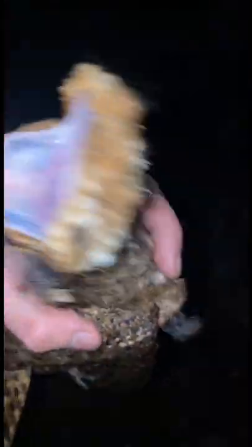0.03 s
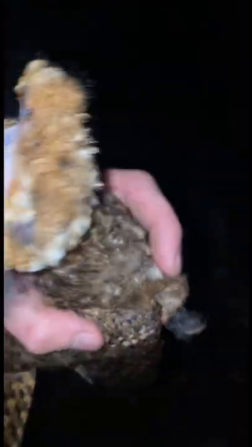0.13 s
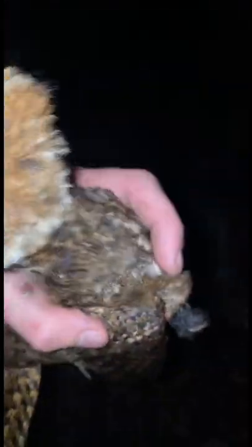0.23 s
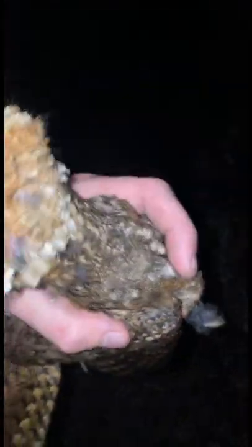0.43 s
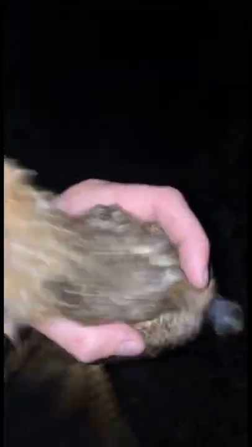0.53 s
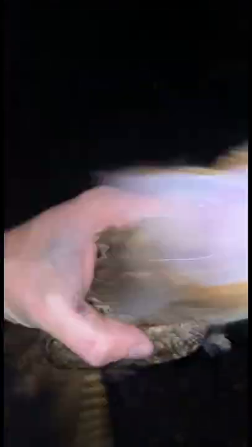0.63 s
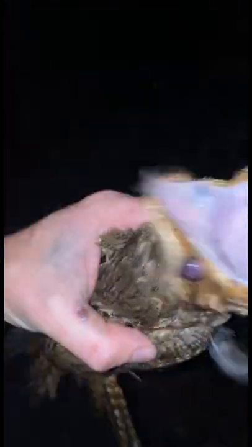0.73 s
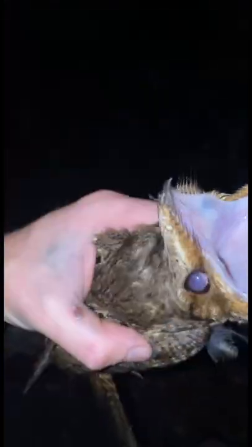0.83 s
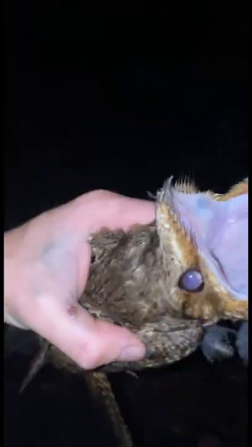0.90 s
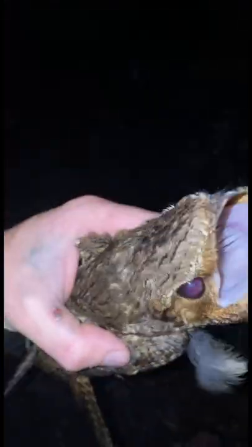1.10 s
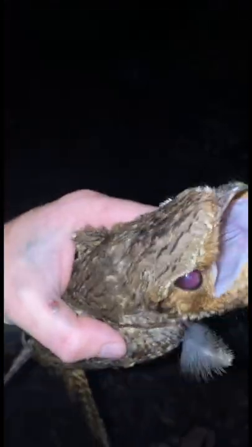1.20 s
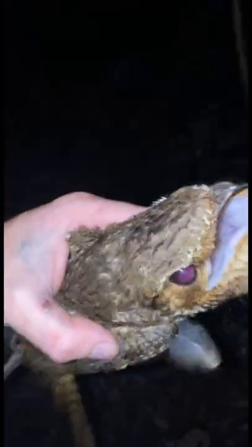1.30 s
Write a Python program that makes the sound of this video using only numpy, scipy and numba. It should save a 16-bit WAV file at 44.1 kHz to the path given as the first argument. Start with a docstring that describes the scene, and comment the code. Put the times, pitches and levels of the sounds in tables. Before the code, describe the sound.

A bird held in the hand gives one low, rasping growl close to the microphone. Feathers rustle and crackle in the grip, a faint soft note follows, then a sharp snap. Distant insects and a low hum fill the night.

```python
"""A bird held in the hand, close to the microphone, gapes and gives one low, rasping growl.
Its syrinx buzzes on an unsteady pitch, chopped by a slower flutter, and air rasps through the
wide-open mouth; a faint, nearly pure note follows. Feathers crackle in the grip, just as close.
Farther off in the night air are insects and a faint low hum."""
import sys
import numpy as np
from scipy import signal
from scipy.fft import rfft, irfft
from scipy.io import wavfile
from scipy.ndimage import uniform_filter1d, map_coordinates
from numba import njit

SR = 44100
rng = np.random.default_rng(int(sys.argv[2]) if len(sys.argv) > 2 else 0)


def to_wav(sig):
    """Store sig (one row per channel, or 1-D mono) as 16-bit WAV at the path in sys.argv[1].

    Samples outside -1..1 are clipped; the rate is SR.
    """
    pcm = np.clip(np.atleast_2d(sig), -1, 1) * 32767
    pcm = np.round(pcm).astype(np.int16)
    wavfile.write(sys.argv[1], SR, pcm.T)  # frames by channels


N = 59535
TIME = np.arange(N) / SR
JITTER, JITTER_PER_S = 0.062, 330  # scatter of the bird's pitch as a share, and its speed


def growl():
    """The bird, close to the microphone: the syrinx sounds through the throat and the open mouth."""
    # Each row: time in seconds, pitch in Hz, level in dB, roughness (0 tone, 1 and above rattle).
    call = [(.16, 295, -63, 0), (.184, 320.8, -48, 0.42), (.2, 396.6, -43.5, 0.53),
            (.206, 390.6, -30.5, 0.42), (.221, 317.3, -31, 0.2), (.232, 310.7, -37, 0.2),
            (.258, 310.7, -40, 0.3), (.268, 345.5, -32, 0.1), (.283, 340.2, -31, 0.36),
            (.299, 379, -42, .6), (.314, 423.9, -27, 0.7), (.324, 432.7, -35, 0.75),
            (.35, 416.5, -27.5, 0.27), (.367, 443.7, -37.5, 0.77), (.38, 365.2, -26, 0),
            (.405, 395.1, -28.5, 0.18), (.432, 462.5, -29, 0.5), (.455, 503.2, -30.5, 0.16),
            (.468, 588.3, -28, 0.05), (.482, 564.7, -23.5, 0), (.487, 562.7, -41.5, 0.4),
            (.507, 470.2, -35, 0.9), (.512, 497.4, -27.5, 0.5), (.535, 427.8, -36, .7),
            (.565, 476.2, -37.5, 0.7), (.61, 466.4, -41, 0.7), (.643, 419.4, -45, 1.1),
            (.675, 321, -53, 0.7), (.72, 329, -61, 0.4)]
    # Each row: time in seconds, level of the air in the throat in dB, level in the mouth in dB.
    breath = [(.184, -72.5, -75), (.196, -45, -47), (.207, -42.5, -49.5), (.245, -60.5, -60.5),
              (.266, -43, -57), (.295, -50, -62), (.313, -37, -44), (.335, -46, -53), (.353, -40, -45.5),
              (.38, -40, -52.5), (.435, -39, -46), (.478, -35.5, -38.5), (.49, -50.5, -40.5),
              (.507, -42.5, -45.5), (.513, -37.5, -39), (.524, -49, -47), (.57, -52, -49), (.63, -65, -53),
              (.67, -67, -72), (.72, -95, -91)]
    start, end, fade_s = call[0][0], call[-1][0], 0.02
    gate = np.clip((TIME - start) / fade_s + 1, 0, 1) * np.clip((end - TIME) / fade_s + 1, 0, 1)
    pitch, effort = curve(call, column=1), undb(curve(call, column=2))
    rough = np.clip(curve(call, column=3), 0, 1)
    voice, overtones, puffs = syrinx(pitch, effort, rough)
    body = voice + (overtones + throat(puffs, pitch)) * undb(curve(breath, column=1))
    body = body - resonate(body, hz=1684, width_hz=310)  # antiresonance of the gape
    # The bird gives almost nothing below 230 Hz.
    body = signal.sosfiltfilt(signal.butter(5, 230, "high", fs=SR, output="sos"), body)
    return gate * (body + mouth(puffs) * undb(curve(breath, column=2) + 1))


def syrinx(pitch, effort, rough):
    """The syrinx passes between a buzzing tone and a flapping rattle, and lets air through in puffs."""
    # Each row: multiple of the pitch, level in dB against the air in the throat.
    partials = [(2, -1), (3, -17.5), (4, -17.5)]
    flutter_hz, flutter_bend, flutter_depth = 112, 0.16, 0.65
    shimmer_db, smear_radians = 2.8, 0.65
    evenness, evenness_s = 0.87, 0.014
    flap_phase = turn(flutter_hz * np.exp(0.18 * walk(150)))
    flap_cycles, flutter = flap_phase / (2 * np.pi), np.sin(flap_phase)
    phase = turn(pitch * (1 + JITTER * walk(JITTER_PER_S) + flutter_bend * rough * flutter))
    throb = unit((1 + flutter_depth * np.sqrt(rough) * flutter) * undb(shimmer_db * walk(200)))
    tone = -np.sqrt(2) * np.cos(phase) * throb * undb(0.5)
    flaps = np.diff(np.floor(flap_cycles), prepend=0)
    rattle = band(flaps, pitch, width_hz=238) * undb(-1.5)  # each flap rings at the pitch
    swing = np.sqrt(1 - rough ** 2) * tone + rough * rattle
    power = uniform_filter1d(swing ** 2, int(evenness_s * SR)) + 1e-9
    voice = effort * undb(0.5) * swing / power ** (evenness / 2)  # the swing is held nearly steady
    chest = undb(3.5) * resonate(effort * rough * rattle, hz=340, width_hz=49)  # a lingering low ring
    upper = sum(undb(db) * np.cos(k * phase + smear_radians * walk(400)) for k, db in partials)
    overtones = -np.sqrt(2) * throb * upper
    bursts = 1 + 2 * np.exp(-(flap_cycles % 1) / 0.43)  # air bursts out as each flap opens
    grain = undb(walk(900))
    puffs = unit(bursts * np.exp(0.5 * np.cos(phase)) * grain)
    return voice + chest, overtones, puffs


def throat(puffs, pitch):
    """Puffs of air ring the throat, which climbs with the pitch, and the windpipe, which stays put."""
    climbing = undb(-2) * band(puffs * rng.standard_normal(N), hz=407 + 1.18 * pitch, width_hz=360)
    windpipe = undb(-6.5) * band(puffs * rng.standard_normal(N), hz=958, width_hz=310)
    return climbing + windpipe


def mouth(puffs):
    """Puffs of air rasp through the wide-open mouth."""
    # Colour of the gape. Each row: frequency in Hz, relative level in dB.
    gape_colour = [(200, -21.5), (700, -17), (1400, -2.5), (1700, -11.5), (1980, 2), (2350, 3), (2680, -3),
                   (3050, -10.5), (4200, -19.5), (5600, -23), (6700, -26.5), (8500, -38.5), (10600, -49.5),
                   (12700, -30), (15500, -50)]
    return colour(puffs * rng.standard_normal(N), gape_colour)


def afternote():
    """A last soft, nearly pure note of the syrinx."""
    # Each row: time in seconds, pitch in Hz, level in dB.
    note = [(.8, 330.6, -79), (.83, 350, -60), (.858, 354, -65), (.885, 343, -80)]
    pitch = curve(note, column=1) * (1 + JITTER * walk(JITTER_PER_S))
    sounding = (TIME > note[0][0]) & (TIME < note[-1][0])
    return np.sqrt(2) * np.sin(turn(pitch)) * undb(curve(note, column=2)) * sounding


def rustle():
    """The hand rubs softly on the plumage, close to the microphone."""
    # Each row: time in seconds, level in dB.
    levels = [(0, -82.5), (.3, -51.5), (.58, -50), (.72, -60.5), (.9, -68.5), (1.02, -66), (1.12, -58),
              (1.35, -60.5)]
    # Each row: frequency in Hz, relative level in dB.
    plumage_colour = [(22, -9), (55, 6), (130, 2), (300, -2.5), (900, -8.5), (1600, -12), (2600, -9.5),
                      (3500, -22.5), (6500, -23.5), (9000, -41), (15500, -34.5)]
    friction = rng.standard_normal(N) * unit(undb(3.2 * walk(300)))
    return colour(friction, plumage_colour) * undb(curve(levels))


def crackles():
    """Feathers crackle in the grip, each a burst of noise a few milliseconds long."""
    # Each row: start in seconds, level in dB, decay in seconds.
    events = [(.263, -53, 0.0022), (0.5678, -39.5, 0.0039), (0.572, -40, 0.0027), (.597, -27, .0019),
              (0.649, -44, 0.0035), (0.676, -45, 0.0024), (.683, -49, 0.0024), (0.763, -57, 0.0054),
              (0.77, -50, 0.0033)]
    # Each row: frequency in Hz, relative level in dB.
    feather_colour = [(300, 11.5), (900, 6), (1700, 4.5), (2400, 6), (3700, 3.5), (5200, -10), (6500, 0.5),
                      (8300, -36), (10500, -34.5), (12700, -15.5), (15500, -38)]
    rise_s = 0.00081
    envelope = np.zeros(N)
    for start, db, decay_s in events:
        age = np.maximum(TIME - start, 0)
        envelope += undb(db) * (1 - np.exp(-age / rise_s)) * np.exp(-age / decay_s)
    return colour(envelope * rng.standard_normal(N), feather_colour)


def ticks():
    """Small dry ticks of the plumage in the hand."""
    # Each row: start in seconds, level in dB.
    events = [(.7055, -45), (.728, -49)]
    # Each row: frequency in Hz, relative level in dB.
    tick_colour = [(200, -6), (900, 11), (1700, 5), (2500, -5), (4000, -15), (7000, -14), (10000, -33),
                   (15500, -37)]
    decay_s = 0.0016
    envelope = np.zeros(N)
    for start, db in events:
        age = np.maximum(TIME - start, 0)
        envelope += undb(db) * (TIME >= start) * np.exp(-age / decay_s)
    return colour(envelope * rng.standard_normal(N), tick_colour)


def snaps():
    """Sharp snaps in the hand, each with a soft low knock."""
    # Each row: start in seconds, snap level in dB, knock level in dB.
    events = [(1.291, -24.5, -36), (1.296, -43, -58)]
    # Each row: frequency in Hz, relative level in dB.
    snap_colour = [(200, -7), (1400, -4), (2000, -5), (2900, 2), (4200, -12.5), (7000, -20), (10000, -23),
                   (13000, -29), (15500, -30)]
    knock_hz, knock_decay_s = 162, 0.0024
    clicks, knocks = np.zeros((2, N))
    for start, snap_db, knock_db in events:
        age = np.maximum(TIME - start, 0)
        clicks[int(start * SR)] += undb(snap_db)
        knocks -= undb(knock_db) * np.sin(2 * np.pi * knock_hz * age) * np.exp(-age / knock_decay_s)
    return colour(clicks, snap_colour) + knocks


def night():
    """Behind the bird: still air, a wavering low hum and a far insect chorus with one nearer cricket."""
    # Each row: frequency in Hz, relative level in dB.
    air_colour = [(20, -16.5), (50, -1.5), (110, -1.5), (170, -11), (280, -17.5), (600, -16), (900, -16),
                  (1300, -24), (1850, -30), (2500, -29), (3400, -33), (5500, -38), (7000, -37.5),
                  (8800, -47.5), (10700, -49), (12500, -36), (15500, -52)]
    # Each row: time in seconds, level in dB.
    hum_levels = [(0, -58), (.12, -54), (.3, -59), (.7, -56.5), (.9, -55), (1.02, -64), (1.35, -58.5)]
    hum_hz, waver_db = 91, 3
    air = colour(rng.standard_normal(N), air_colour) * undb(-57.5 + 0.24 * walk(10))
    hum_tone = np.sin(turn(hum_hz * (1 + 0.016 * walk(18))))
    hum = unit(hum_tone * undb(waver_db * walk(11.86))) * undb(curve(hum_levels))
    chorus = band(rng.standard_normal(N), hz=4700, width_hz=760) * undb(-72 + 2 * walk(45))
    cricket = band(rng.standard_normal(N), hz=4590, width_hz=160) * undb(-74)
    return air + hum + chorus + cricket


def undb(db):
    """Decibels to gain."""
    return 10 ** (np.asarray(db) / 20)


def unit(x):
    """Scale to rms 1."""
    return x / np.sqrt(np.mean(x ** 2))


def curve(table, column=1):
    """One column of a table, joined by straight lines in time."""
    rows = np.array(table)
    return np.interp(TIME, np.sort(rows[:, 0]), rows[:, column])


def walk(rate):
    """A smooth random wander at rms 1 that changes rate times a second."""
    return unit(map_coordinates(rng.standard_normal(4096), [TIME * rate + 2], order=3, mode="wrap"))


def turn(hz):
    """Phase in radians of a changing frequency."""
    return 2 * np.pi * np.cumsum(hz) / SR


def colour(x, points):
    """Causal filter through (Hz, dB) points that keeps the power of white noise."""
    rows, size = np.array(points), 2 * N
    hz = np.maximum(np.arange(N + 1) * SR / size, 1)
    gain = unit(undb(np.interp(np.log(hz), np.log(rows[:, 0]), rows[:, 1])))
    cepstrum = irfft(np.log(gain))
    cepstrum[1:N] *= 2  # folded onto positive time for minimum phase
    cepstrum[N + 1:] = 0
    return irfft(rfft(x, size) * np.exp(rfft(cepstrum)))[:N]


@njit
def resonate(x, hz, width_hz):
    """Band-pass with a steady or moving centre."""
    centre = hz * np.ones(len(x))
    y, band_state, low_state = np.empty(len(x)), 0., 0.
    for i in range(len(x)):
        step, damping = np.tan(np.pi * centre[i] / SR), width_hz / centre[i]
        ring = (band_state + step * (x[i] - low_state)) / (1 + step * (step + damping))
        band_state = 2 * ring - band_state
        low_state += 2 * step * ring
        y[i] = damping * ring
    return y


def band(x, hz, width_hz):
    """A steep resonance at rms 1."""
    return unit(resonate(resonate(x, hz, width_hz), hz, width_hz))


def scene():
    """The bird in the hand at one close microphone, with the night behind it."""
    return (growl() + rustle() + crackles() + ticks() + snaps() + night() + afternote())[None, :]


def record(dry):
    """The recorder thins the deepest bass and cuts the top."""
    bass_cut_hz, top_hz = 35, 15750
    thinned = signal.sosfilt(signal.butter(3, bass_cut_hz, "high", fs=SR, output="sos"), dry)
    return signal.sosfilt(signal.ellip(10, .2, 70, top_hz, fs=SR, output="sos"), thinned)


dry = scene()
out = record(dry)
to_wav(out)
```